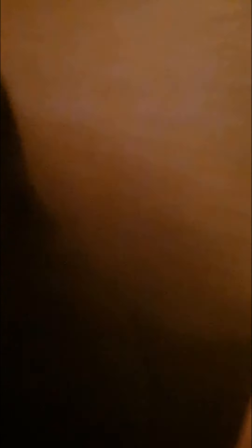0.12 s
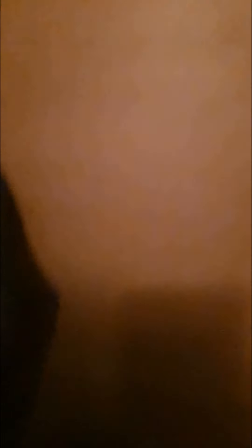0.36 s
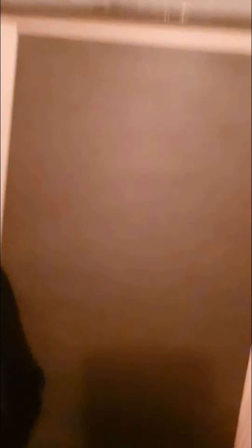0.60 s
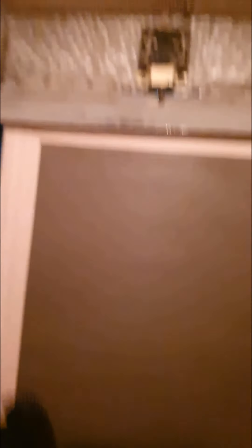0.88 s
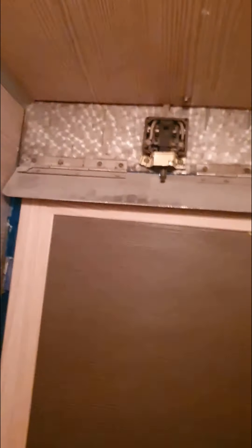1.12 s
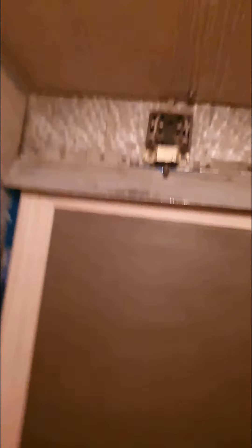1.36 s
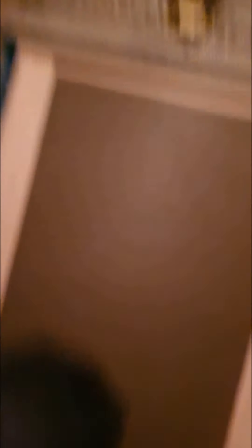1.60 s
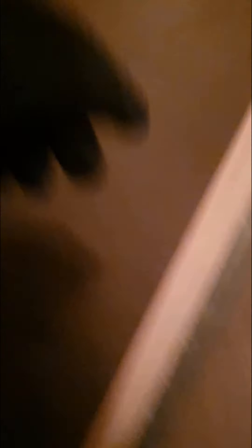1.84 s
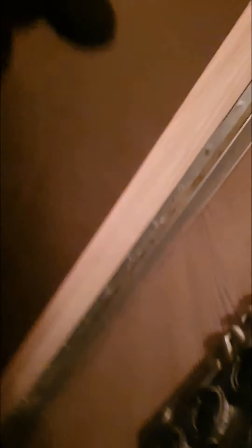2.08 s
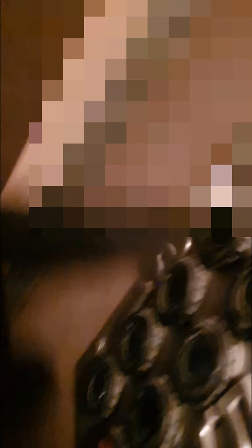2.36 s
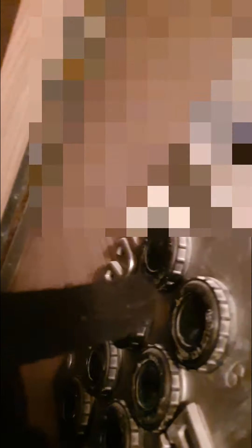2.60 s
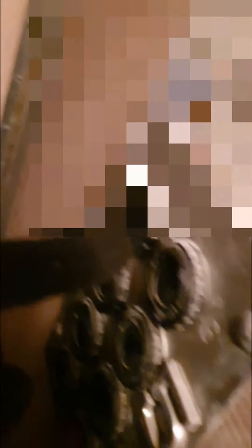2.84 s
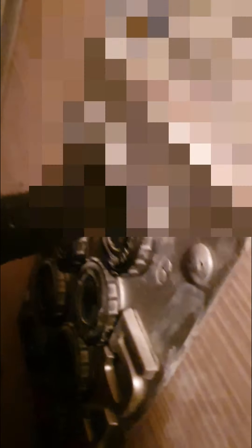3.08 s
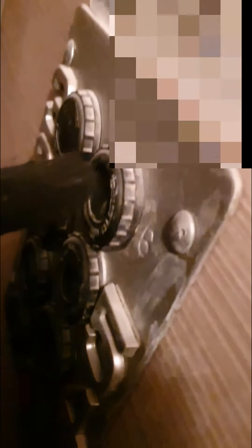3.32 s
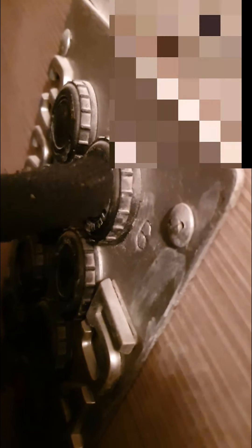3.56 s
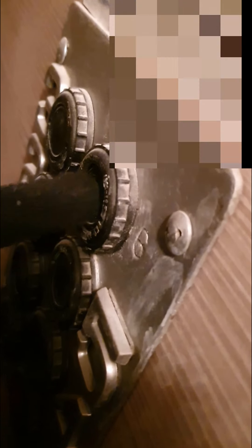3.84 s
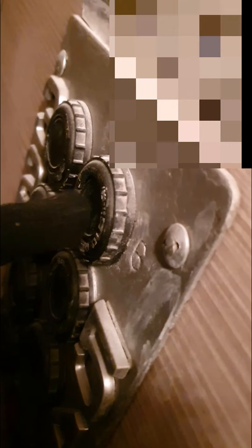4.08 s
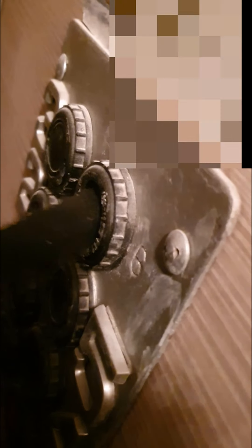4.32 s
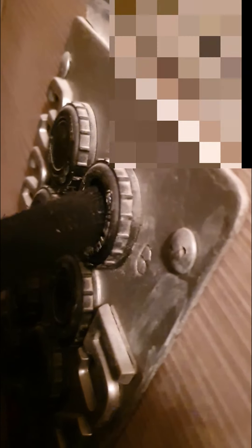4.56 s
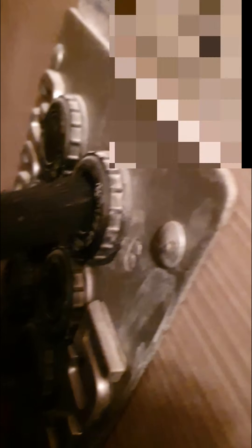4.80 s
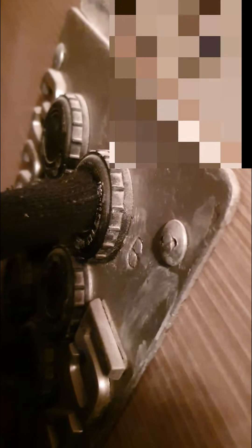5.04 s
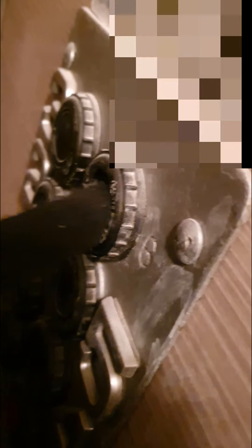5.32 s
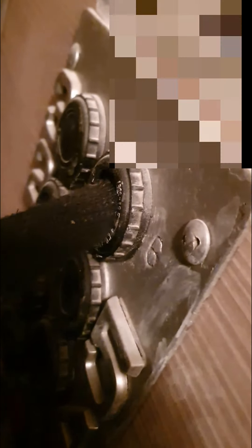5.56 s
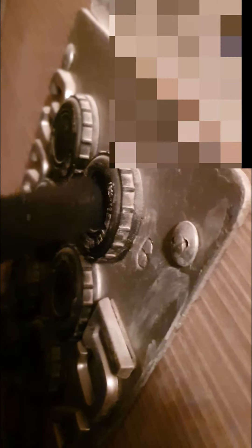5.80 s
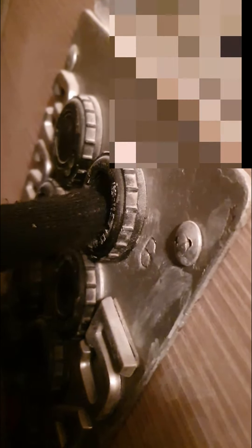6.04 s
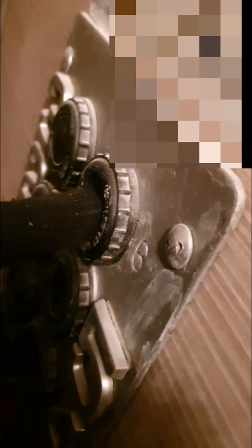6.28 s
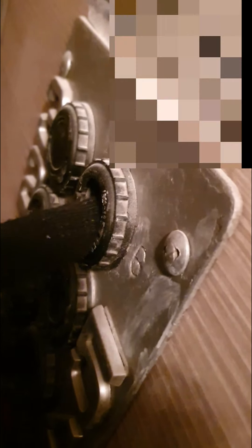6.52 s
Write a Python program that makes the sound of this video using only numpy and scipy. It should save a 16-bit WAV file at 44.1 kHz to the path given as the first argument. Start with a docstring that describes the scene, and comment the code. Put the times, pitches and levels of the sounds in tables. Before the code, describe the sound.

Fabric slides and brushes near a handheld microphone while feet shift on a hollow floor. The start is heaviest, booming deeply under a crisp tick. A second surge of rustling passes midway through the first half, then fades. Later, isolated dry ticks, short scuffs and dull hollow thuds stand out against quiet, including a tiny high squeak. Nearby hard walls give quick reflections and a short tail.

```python
"""Cloth and footsteps on a hollow floor

Cloth rustles and slides close to a handheld microphone in a small hard-walled space: shaped, fluttering noise.
Feet shift and step on a hollow floor: grit ticks are short noise and rings, heel knocks are dying sines.
The floor booms after steps (noise through resonances) and drums above that (low noise).
One rubber sole squeaks: a stack of overtones. Wall echoes and a short tail follow the ticks, knocks and squeak.
"""
import sys
import numpy as np
from scipy import signal
from scipy.fft import rfft, irfft
from scipy.io import wavfile
from scipy.ndimage import uniform_filter1d

SR = 44100
rng = np.random.default_rng(int(sys.argv[2]) if len(sys.argv) > 2 else 0)


def amplitude_ratio(level_db):
    """Convert a level in decibels to the matching linear amplitude (field) ratio."""
    exponent = np.asarray(level_db, float) / 20
    return 10 ** exponent


def store_wav(level_fs):
    """Save 16-bit WAV to argv[1]."""
    pcm = np.round(np.clip(np.atleast_2d(level_fs), -1, 1) * 32767)
    wavfile.write(sys.argv[1], SR, pcm.T.astype(np.int16))


N = 293706  # length in samples


def evened(x):
    """Scales a sound to an rms of 1."""
    return x / np.sqrt(np.mean(x ** 2) + 1e-20)


def read(points, hz):
    """Reads a curve at the given frequencies, with straight lines over log frequency."""
    f, value = np.transpose(points)
    return np.interp(np.log(hz + 1), np.log(f + 1), value)


def curves(rows):
    """Every column of a timed table, sample by sample."""
    s, *columns = np.transpose(rows)
    return [np.interp(np.arange(N) / SR, s, c) for c in columns]


def sides(pan_db):
    """Left and right gains that differ by pan_db; positive is louder on the left."""
    return amplitude_ratio(np.array([pan_db / 2, -pan_db / 2]))


def add(mix, s, sound):
    """Adds a sound to the mix from s seconds on, cut at the end."""
    part = mix[:, round(s * SR):][:, :sound.shape[1]]
    part += sound[:, :part.shape[1]]


def peaks_db(s, level_db, before, after):
    """The loudest of several events at each sample; before and after give the dB lost at a distance in s."""
    t = np.arange(N) / SR
    events = []
    for k, (at, db) in enumerate(zip(s, level_db)):
        lost_db = np.where(t < at, before(k, at - t), after(k, t - at))
        events.append(db - lost_db)
    return np.max(events, axis=0)


def noise(spectrum, patchy_db, tilt_db=0, size=512):
    """Two-channel random short-time spectra with drifting patches; tilt_db leans the spectrum per octave."""
    # how alike left and right are: f/Hz, likeness (1 = the same)
    likeness = [(60, 0.69), (250, 0.9), (1000, 0.17), (3500, 0.2), (12000, 0.05)]
    frames, hz = N * 4 // size + 5, np.fft.rfftfreq(size, 1 / SR)
    a, b, c, d, patches = rng.standard_normal((frames, len(hz), 5)).T
    patches = uniform_filter1d(patches, size=8, axis=0)
    patches = evened(uniform_filter1d(patches, size=12, axis=1))
    tilt_db = np.interp(np.arange(frames) * size / 4, np.arange(N), tilt_db * np.ones(N))
    same = np.clip(read(likeness, hz), -1, 1)[:, None]
    left = a + 1j * b
    right = same * left + np.sqrt(1 - same ** 2) * (c + 1j * d)
    octaves = np.log2((hz + 50) / 3500)  # the spectrum leans about 3500 Hz
    shape_db = read(spectrum, hz)[:, None] + patchy_db * patches + np.outer(octaves, tilt_db)
    z = np.array([left, right]) * amplitude_ratio(shape_db)
    return evened(signal.istft(z, nperseg=size, noverlap=size * 3 // 4)[1][:, :N])


def cloth():
    """Fibres drag in a fine hiss that flutters as folds catch; soles scuff with a duller one."""
    # cloth moving near the microphone: t/s, level/dB, brightness/dB per octave
    rustle = [(0, -51.5, -0.5), (.24, -50, 1), (.3, -42.5, -1), (.385, -39.5, -1), (.41, -46.5, 0.5),
              (.62, -47, 1.5), (1.0, -51, 0.5), (1.17, -57, -0.5), (1.22, -67.5, -.6), (1.3, -66, -1),
              (1.42, -51, -0.2), (1.5, -46, 1), (1.88, -37, -0.6), (2.15, -43, -0.5), (2.24, -45.5, 0.9),
              (2.31, -52.5, -1), (2.38, -50.5, -0.6), (2.58, -45.5, -0.15), (2.7, -48.5, -0.2),
              (2.85, -56.5, -1.5), (3.2, -62, 0.5), (3.3, -59, 0.2), (3.48, -67, 1.5), (3.75, -61.5, -2),
              (3.9, -62.5, -2.5), (4.12, -68, 0), (4.55, -64, 2), (5.0, -73, 1.5), (5.12, -75, 2.5),
              (5.16, -81, 5.5), (5.3, -78.5, 5), (5.45, -66, 1), (5.56, -75, 5.5), (5.6, -83, 8.5),
              (5.72, -82, 7), (5.88, -61, -1.5), (6.3, -69, -0.5), (6.66, -68.5, -2)]
    # colour of the hiss before it leans: f/Hz, relative density/dB per Hz
    hiss = [(180, -30), (300, 1.5), (385, -18), (418, -14.5), (462, -13), (667, -8), (930, -8),
            (2280, -5.5), (6740, -13), (7690, -18.5), (10900, -17.5), (15000, -23), (16000, -43.5),
            (16300, -70)]
    # soles scuffing in and dragging off: loudest t/s, level/dB, rise/s, fade/dB per s
    scuffs = [(0.0, -42.5, .01, 296.5), (4.26, -60.5, 0.14, 44), (4.67, -61, .035, 40.5),
              (5.32, -56, 0.038, 82.5), (5.756, -52.5, 0.037, 74), (6.39, -57, 0.019, 47),
              (6.66, -50.5, 0.12, 45)]
    onset_db = -11  # the sole touches down this far below its peak
    scuff_bright_db = -3.0  # per octave
    level_db, bright_db = curves(rustle)
    s, peak_db, rise, fade = np.transpose(scuffs)

    def before(k, t):
        return -onset_db * t / rise[k] + 4000 * np.maximum(t - rise[k], 0)

    def after(k, t):
        return fade[k] * t

    scuff_db = peaks_db(s, peak_db, before, after)
    share = 1 / (1 + amplitude_ratio(2 * (level_db - scuff_db)))  # of the power that comes from the soles
    both_db = level_db - 10 * np.log10(1 - share + 1e-9)
    flutter_db = 0.65 * evened(uniform_filter1d(rng.standard_normal(N), size=300))
    tilt_db = bright_db + share * (scuff_bright_db - bright_db)
    return amplitude_ratio(both_db + flutter_db) * noise(hiss, patchy_db=0.5, tilt_db=tilt_db)


def resonate(x, hz, width):
    """A resonance of gain 1: shifts hz down to zero, smooths, and shifts back."""
    turn = np.exp(2j * np.pi * np.cumsum(hz * np.ones(x.shape[-1])) / SR)
    r = np.exp(-np.pi * width / SR)
    return 2 * (turn * signal.lfilter([1 - r], [1, -r], x / turn + 1e-18)).real


def loads_db():
    """Level of each floor layer: the slow load, or the thump that rises above it."""
    # slow load on the hollow floor: t/s, deep boom/dB, upper boom/dB, drumming/dB
    slow_load = [(0, -23.5, -45, -43), (.2, -49, -39, -54), (.55, -45, -48, -77), (.7, -55, -57, -68),
                 (1.09, -59, -60, -76), (1.33, -57, -54.5, -97), (1.59, -51.5, -49, -53),
                 (1.8, -46, -46, -50.5), (2.15, -45, -50, -54), (2.43, -46.5, -47, -57.5),
                 (2.54, -48, -48, -54), (2.75, -59, -59, -62.5), (2.93, -53.5, -64, -65.5),
                 (3.2, -60.5, -69, -78), (3.47, -63.5, -60, -76), (3.53, -66, -61, -62),
                 (3.8, -62, -59, -56.5), (4.13, -73, -63, -62), (4.23, -52.5, -57, -73),
                 (4.6, -56, -56.5, -66), (5.21, -70.5, -67, -80.5), (5.351, -60, -49, -61),
                 (5.62, -59, -72.5, -95), (5.75, -56, -51.5, -63.5), (5.95, -54, -58, -55),
                 (6.1, -57, -64, -61.5), (6.32, -67.5, -63.5, -64), (6.66, -57, -61, -58)]
    # weight landing, before the lags below: arrival t/s, held/s, deep boom/dB, upper boom/dB, drumming/dB
    thumps = [(.06, 0.024, -29, -24.5, -38.5), (.16, 0.022, -36, -35, -49), (.29, 0.032, -42, -36.5, -47),
              (.38, 0.0088, -42, -36.5, -49.5), (.44, .05, -48, -42.5, -56.5),
              (.62, 0.014, -46, -56, -57.5), (.72, 0.025, -42.5, -61, -75), (.77, 0.023, -44, -49.5, -64),
              (.985, 0.026, -44.5, -44, -65), (1.61, 0.013, -38.5, -39, -53), (1.69, 0.012, -35, -48, -54),
              (1.85, 0.019, -54, -37.5, -44), (1.97, 0.0051, -49, -40, -39.5),
              (4.329, 0.083, -39.5, -38.5, -53.5), (4.71, 0.059, -42, -37.5, -53),
              (5.4, 0.034, -38.5, -41, -62), (5.809, 0.058, -44.5, -39.5, -50),
              (6.436, 0.06, -43, -38, -56), (6.639, .03, -42.5, -49, -59)]
    # each for deep boom, upper boom, drumming; the deep boom builds last
    lags_s = (0.014, .004, 0.0019)
    rises_db_per_s, fades_db_per_s = (260, 300, 349.5), (96.5, 256, 303)
    s, held, *columns = np.transpose(thumps)
    levels = []
    for slow_db, db, lag, rise, fade in zip(curves(slow_load), columns, lags_s, rises_db_per_s, fades_db_per_s):
        thump_db = peaks_db(s + lag, db, lambda k, t: rise * t,
                            lambda k, t: fade * np.maximum(t - held[k], 0))
        levels.append(np.maximum(slow_db, thump_db))
    return levels


def floor():
    """The cavity under the boards booms in a deep and an upper pair of modes; the boards drum above."""
    # boards drumming: f/Hz, relative density/dB per Hz
    drum = [(71, -32), (120, -2), (167, -11.5), (274, 2.5), (344, -7), (462, -8.5), (626, -15.5),
            (900, -21), (1170, -58.5), (1980, -120)]
    # deep pair, then upper pair of cavity modes: f/Hz, width of the first of two passes/Hz, level/dB
    cavity = [(57.6, 10, -3), (42.4, 40, -4)], [(93.6, 20.1, -3.5), (78.9, 25, -3)]
    *boom_db, drum_db = loads_db()
    out = amplitude_ratio(drum_db) * noise(drum, patchy_db=2.35, size=2048)
    for level_db, modes in zip(boom_db, cavity):
        # long waves reach both ports almost alike
        drive = rng.standard_normal(N) + 0.29 * rng.standard_normal((2, N))
        rings = 0
        for hz, width, db in modes:
            once = resonate(drive, hz, width)
            rings = rings + amplitude_ratio(db) * evened(resonate(once, hz, 2.2 * width))
        # evens out the noise's own swelling so the boom follows its level curve
        swelling = uniform_filter1d((rings ** 2).mean(0), size=1500) + 0.034
        out += amplitude_ratio(level_db) * evened(rings / swelling ** 0.38)
    return out


def hit(ring_hz, ring_db, ring_t60, knock_db, sharp_db):
    """A sharp crack, a dying spray of grit, two short rings, and a soft blow on the boards."""
    # colour of the grit before sharpness: f/Hz, level/dB
    grit_colour = [(300, -24.5), (1000, -4), (2500, -1.5), (6500, -6.5), (8000, -11.5), (16000, -8.5)]
    # ringing modes of the boards: f/Hz, highest relative level/dB, t60/s
    board = [(193, -3, 0.095), (285.5, -8.5, 0.063), (355, -8.5, 0.069), (514, -13.5, 0.5),
             (553, 7.5, 0.04), (623, -16.5, 0.33), (760.6, -10.5, 0.2), (1139, -10, 0.094)]
    grit_t60, crack_t60 = 0.061, 0.015  # s
    second_hz, second_db = 1.7 * ring_hz, ring_db - 18.5
    t = np.arange(round(.6 * SR)) / SR
    crack = rng.standard_normal(len(t)) * (amplitude_ratio(-60 * t / grit_t60) + 2.1 * amplitude_ratio(-60 * t / crack_t60))
    hz = np.fft.rfftfreq(2 * len(t), 1 / SR)
    colour = amplitude_ratio(read(grit_colour, hz) + sharp_db * np.clip(hz / 11000, 0, 1) ** 2)
    grit = irfft(rfft(crack, 2 * len(t)) * colour)[:len(t)]
    rings = amplitude_ratio(ring_db) * np.sin(2 * np.pi * ring_hz * t)
    rings += amplitude_ratio(second_db) * np.sin(2 * np.pi * second_hz * t)
    rings *= amplitude_ratio(-60 * t / ring_t60)
    knock = 0
    for (f, db, t60), (weaker, phase) in zip(board, rng.random((len(board), 2))):
        # each blow weakens every mode by up to 10 dB at random
        knock = knock + amplitude_ratio(db - 10 * weaker - 60 * t / t60) * np.sin(2 * np.pi * (f * t + phase))
    knock = knock * (1 - np.exp(-t / 0.0017))  # soft start
    return grit / abs(grit).max() + rings + amplitude_ratio(knock_db) * knock / abs(knock).max()


def squeak():
    """Rapid stick-slip of rubber: a near-clean stack of overtones on a wavering pitch that mostly rises."""
    # the sole sticks and slips: t/s, pitch/Hz, level/dB
    glide = [(4.666, 3560, -56.5), (4.669, 3570, -37.5), (4.671, 3610, -16), (4.677, 3445, -18.5),
             (4.683, 3710, -20.5), (4.686, 3830, -15.5), (4.691, 3760, -44)]
    # overtones: multiple of the pitch, level/dB
    overtones = [(1, -2), (2, -10), (3, -18.5), (4, -31)]
    s, hz, level_db = np.transpose(glide)
    t = np.arange(s[0], s[-1], 1 / SR)
    waver = 1 + .007 * evened(uniform_filter1d(rng.standard_normal(len(t)), size=60))
    turns = np.cumsum(np.interp(t, s, hz) * waver) / SR
    stack = sum(amplitude_ratio(db) * np.cos(2 * np.pi * round(k) * turns) for k, db in overtones)
    return s[0], amplitude_ratio(np.interp(t, s, level_db)) * stack


def room(x, echo_db, early_db, tail_db, lasting):
    """Wall echoes, a quick scatter, then a tail of sparse random taps, each band dying at its own speed."""
    # near walls: delay t/s, level before echo_db is added/dB
    echoes = [(.0031, 4), (.0068, -5.5), (.0104, -5.5), (.0137, 0.5), (.0185, -7.5), (.024, -10)]
    # dying time of the tail before it is multiplied by lasting: f/Hz, t60/s
    tail_t60 = [(250, 1), (1000, 0.97), (3500, 0.39), (7000, 0.11), (14000, 0.13)]
    taps = np.zeros((2, SR))
    at = np.arange(100, SR - 20, 20) + rng.integers(0, 20, (2, (SR - 101) // 20))
    np.put_along_axis(taps, at, rng.choice([-1., 1.], at.shape), 1)
    hz, t, z = signal.stft(taps, SR, nperseg=256)
    fade = amplitude_ratio(-60 * t / (lasting * read(tail_t60, hz)[:, None]))
    tail = signal.istft(z * fade, SR, nperseg=256)[1][:, :SR]
    early = taps * amplitude_ratio(-60 * np.arange(SR) / SR / 0.085)
    response = amplitude_ratio(tail_db) * tail / np.linalg.norm(tail[0])
    response += amplitude_ratio(early_db) * early / np.linalg.norm(early[0])
    response[:, 0] += 1  # the direct sound
    for k, (s, db) in enumerate(echoes):
        at_each_side = round(s * SR) + np.array([0, 5 * (-1) ** k])  # walls alternate sides
        response[[0, 1], at_each_side] += amplitude_ratio(db + echo_db)
    return signal.fftconvolve(x, response, axes=1)[:, :N]


def scene():
    """Blows take turns through three random room scatters, so their colour varies; squeak, cloth and floor join."""
    # ticks and knocks: t/s, level/dB, ring f/Hz, ring/dB, ring t60/s, knock/dB, sharpness/dB
    # (ring and knock are relative to the grit's peak)
    hits = [(.0517, -18, 3130, -2, 0.016, -32, -20.5), (.2079, -39, 2720, 0, 0.019, -20, -17),
            (.335, -50.5, 2930, -2, 0.018, -2, -16), (.372, -53.5, 1650, -13, .015, -7, -18),
            (1.9644, -33.5, 2370, -5, .015, -3.5, -18.5), (2.4014, -47, 1160, -4, 0.016, 5.5, -19),
            (3.2296, -54.5, 1740, 0, .02, -26, -18), (4.149, -51, 2540, 2, 0.029, -4.5, -19),
            (4.2163, -51, 1690, 0.5, 0.043, -7, -18), (4.2984, -34.5, 3530, -2.2, 0.011, -14, -11),
            (4.3435, -42, 2230, -5, .015, -14, -19.5), (4.3904, -52.5, 1120, -10.5, 0.014, 8, -25.5),
            (4.555, -48.5, 2140, -5, 0.017, -12.5, -8), (4.6403, -54.5, 1170, -1, .02, 1.5, -14.5),
            (4.6872, -28, 2510, -11, .015, -11, -8), (4.7247, -28, 2250, -1, 0.012, -5.5, -7.5),
            (4.7694, -47, 2520, -5, .022, -3, -20), (5.3274, -35, 2700, -14, .015, -6, -10.5),
            (5.3373, -32.5, 2270, -1, 0.016, -15, -27), (5.7069, -57, 1010, -6, 0.028, -10, -17.5),
            (5.7628, -28, 2200, -9, 0.018, -13, -10), (5.7884, -24, 2540, -3, 0.0088, -8.5, 2.5),
            (6.3979, -49.5, 2600, -0.5, 0.27, -19, -49), (6.4184, -29.5, 2446, -1.5, 0.045, -8.5, -12),
            (6.5251, -43.5, 2160, -0.5, 0.028, -22, -49), (6.5605, -49, 1590, 5, 0.025, -12, -36),
            (6.6118, -34.5, 2180, -1.5, 0.025, -9, -6.5), (6.615, -43.5, 5380, 5.5, 0.021, -5, -16)]
    *blow_groups, sole = np.zeros((4, 2, N))
    for k, (s, level_db, *blow_settings) in enumerate(hits):
        blow = hit(*blow_settings)
        add(blow_groups[k % len(blow_groups)], s - .001, amplitude_ratio(level_db) * sides(3.7)[:, None] * blow)
    s, rubber = squeak()
    add(sole, s, sides(-.7)[:, None] * rubber)
    steps = sum(room(blows, echo_db=-9, early_db=1.0, tail_db=-17.5, lasting=0.72) for blows in blow_groups)
    squeal = room(sole, echo_db=-10.5, early_db=0.0, tail_db=-17, lasting=1.6)
    return steps + squeal + cloth() + floor()


def low_pass(x):
    """Removes everything above the highest recorded frequency."""
    return signal.sosfilt(signal.butter(12, 16490, fs=SR, output="sos"), x)


def record(dry):
    """The two microphone ports differ in colour, and the right one hears a moment later."""
    # the left port hears more treble: f/Hz, left minus right/dB
    port_colour = [(60, -0.5), (150, 0), (380, 0.5), (950, -0.5), (2380, -2), (5980, 10.5), (15000, 4)]
    port_delay = .00025  # s; the left port is nearer
    hz = np.fft.rfftfreq(N, 1 / SR)
    delays = np.exp(-2j * np.pi * np.outer([0, port_delay], hz))
    ports = sides(read(port_colour, hz)) * delays
    mix = irfft(rfft(dry) * ports, N)
    return low_pass(mix)


dry = scene()
out = record(dry)
store_wav(out)
```